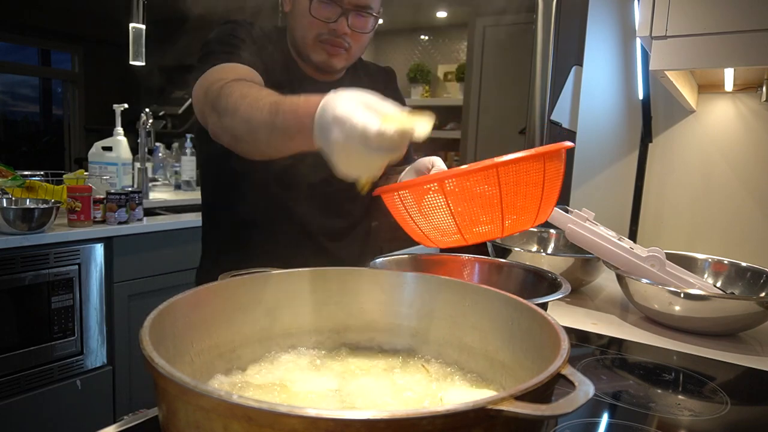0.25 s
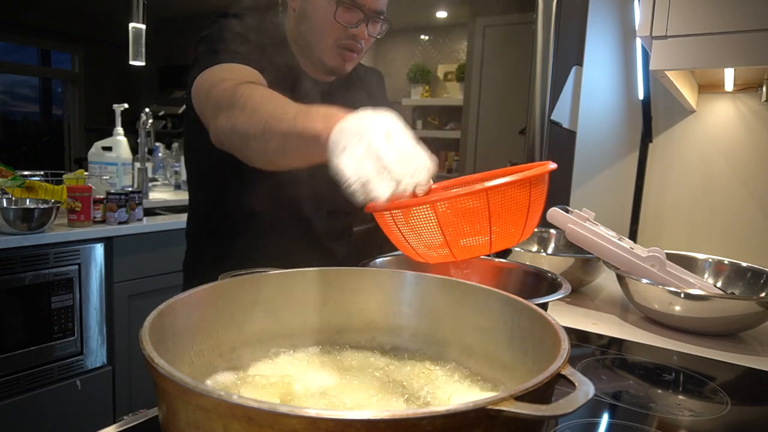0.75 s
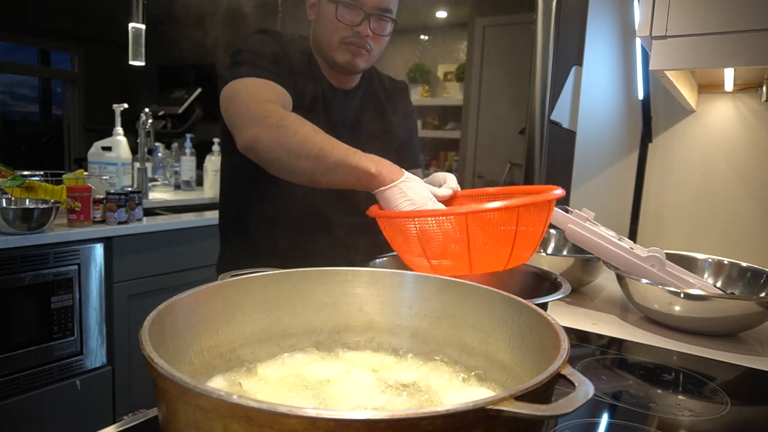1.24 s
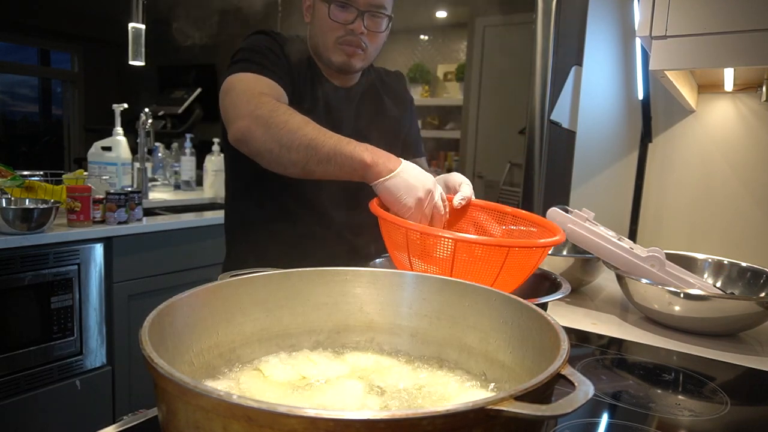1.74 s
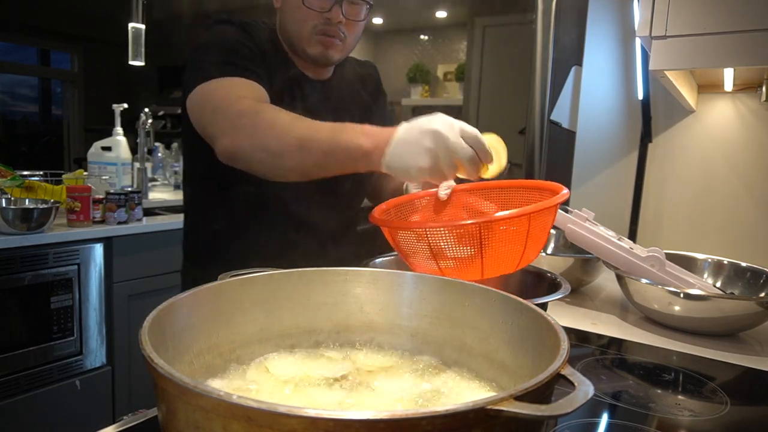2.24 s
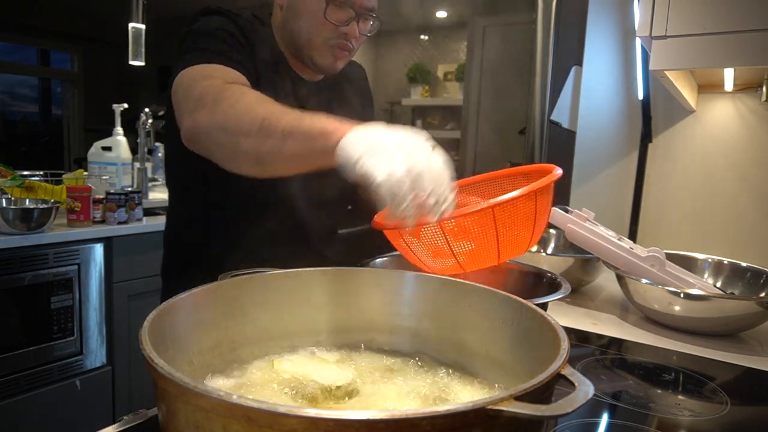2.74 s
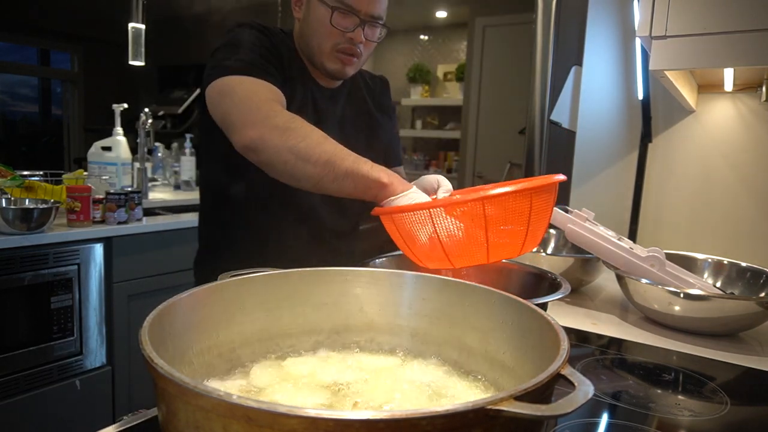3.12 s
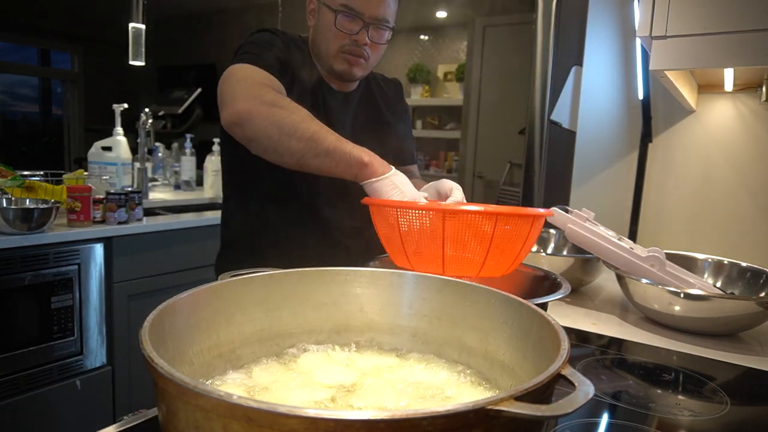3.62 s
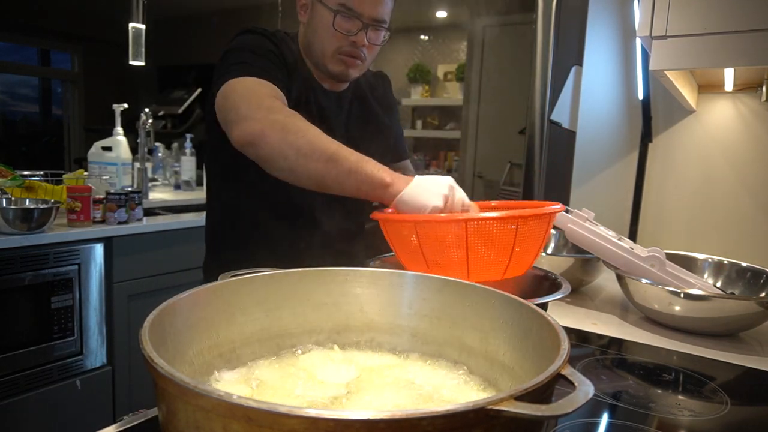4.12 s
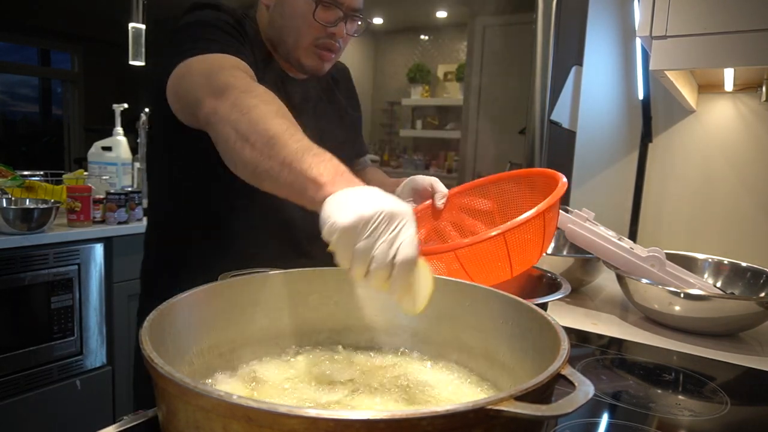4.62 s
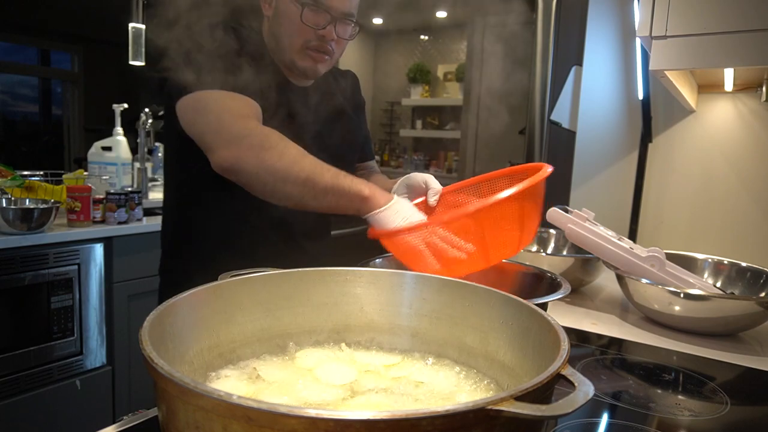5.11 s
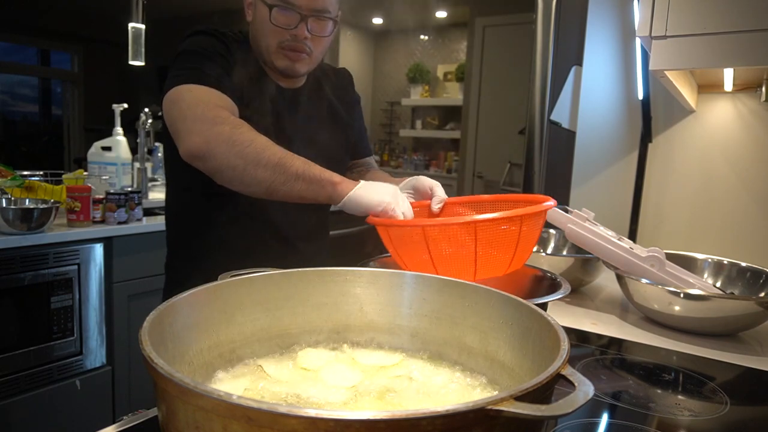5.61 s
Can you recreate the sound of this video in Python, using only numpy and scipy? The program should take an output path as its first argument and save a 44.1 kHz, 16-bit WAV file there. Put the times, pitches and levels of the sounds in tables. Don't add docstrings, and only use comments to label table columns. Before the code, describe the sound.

Close, unbroken deep-frying sizzle: bright fizzing hiss, constant irregular popping and crackling, low glugging bubbles, faint kitchen rumble beneath.

```python
import sys
import numpy as np
from scipy import signal
from scipy.fft import rfft, irfft
from scipy.io import wavfile

SR = 44100
rng = np.random.default_rng(int(sys.argv[2]) if len(sys.argv) > 2 else 0)


def undo_db(level):
    steps = np.asarray(level, float) / 20
    return 10 ** steps


def store_wav(level_fs):
    pcm = np.round(np.clip(np.atleast_2d(level_fs), -1, 1) * 32767)
    wavfile.write(sys.argv[1], SR, pcm.T.astype(np.int16))


N = 258426


def rms_one(x):
    return x / np.sqrt(np.mean(x ** 2) + 1e-20)


def at_hz(points, hz):
    points_hz, points_db = np.transpose(points)
    return np.interp(np.log(hz), np.log(points_hz), points_db)


def coloured(x, points, share=1):
    hz = np.maximum(np.arange(N // 2 + 1) * SR / N, 1)
    return irfft(rfft(x) * undo_db(share * at_hz(points, hz)), N)


def drift(rate_hz):
    r = np.exp(-80 * np.pi * rate_hz / SR)
    slow = signal.lfilter([1], [1, -2 * r, r * r], rng.standard_normal(N // 40 + 2002))[2000:]
    return np.interp(np.arange(N) / 40, np.arange(len(slow)), rms_one(slow))


def ring_poles(hz, r):
    return [1, -2 * r * np.cos(2 * np.pi * hz / SR), r * r]


# time in seconds, vigour of the frying as spray level in dB.
VIGOUR = [(0.0, -32), (0.47, -33), (0.8, -32), (1.2, -32.5), (1.53, -31.5), (2.04, -30.5), (2.45, -32.5),
          (2.97, -31), (3.44, -31.5), (3.85, -31), (4.2, -31.5), (4.58, -30), (4.96, -31.5), (5.4, -30.5),
          (5.86, -30)]


def vigour():
    return np.interp(np.arange(N) / SR, *np.transpose(VIGOUR))


def bubbling(spectrum, per_s, size_db, cycles, clump_db, count):
    sizes = undo_db(size_db * np.minimum(rng.exponential(1, N), 4)) * rng.choice([-1, 1], N)
    born = rng.random(N) < per_s * undo_db(clump_db * drift(22)) / SR
    dealt = rng.integers(0, count, N)
    out = np.zeros(N)
    for k, hz in enumerate(np.geomspace(spectrum[0][0], spectrum[-1][0], count)):
        r = undo_db(-60 * hz / (cycles * SR))
        resonator = [0, 1, 0, *ring_poles(hz, r)]
        rings = signal.sosfilt([resonator, resonator], sizes * born * (dealt == k) + 1e-18)
        out += rms_one(rings) * np.sqrt(hz) * undo_db(at_hz(spectrum, hz))
    return rms_one(out)


# frequency in Hz, level in dB per Hz.
GURGLE_SPECTRUM = [(200, -18), (240, -2.5), (400, -1), (600, -5.5), (750, -9.5), (950, -9.5)]


def gurgle(swing_db):
    gain = undo_db(-30 + 1.98 * swing_db)
    return gain * bubbling(GURGLE_SPECTRUM, per_s=560, size_db=0.5, cycles=9.2, clump_db=1.5, count=16)


# frequency in Hz, level in dB per Hz.
SEETHE_SPECTRUM = [(600, -6.5), (850, -18.5), (1200, 2), (1800, 3.5), (3000, -2.5), (4200, -3), (5150, -8),
                   (5800, -21), (8000, -19)]


def seethe(swing_db):
    gain = undo_db(0.6 * drift(6)) * undo_db(-23.5 + 0.38 * swing_db)
    return gain * bubbling(SEETHE_SPECTRUM, per_s=4000, size_db=3.0, cycles=16.0, clump_db=2.0, count=32)


# frequency in Hz, level in dB per Hz.
FIZZ_SPECTRUM = [(4500, -64), (6000, 15), (8000, -8), (11000, 6), (15500, -4)]


def fizz(vigour_db):
    gain = undo_db(vigour_db - 8.5)
    return gain * bubbling(FIZZ_SPECTRUM, per_s=400, size_db=3.0, cycles=33, clump_db=5.5, count=12)


# frequency in Hz, level in dB per Hz.
SPRAY_SPECTRUM = [(1500, 5.5), (4000, 5.5), (5600, -2.5), (6600, -2.5), (7300, -0.5), (8200, -4.5),
                  (9500, -5), (14000, -9), (16000, -11)]
# frequency in Hz, left-right likeness from 0 to 1.
LIKENESS = [(60, 0.99), (180, 1.0), (550, 1), (1650, 0.6), (4970, 0.18), (15000, 0.3)]


def spray(vigour_db):
    out, together = 0, drift(8)
    edges_hz = 1300 * 2 ** np.arange(0, 4.1, 0.5)
    white = rng.standard_normal((2, 2, N))
    for k, (low, high) in enumerate(zip(edges_hz, edges_hz[1:])):
        band = signal.butter(2, [low, high], "band", fs=SR, output="sos")
        mid, side = signal.sosfilt(band, white[k % 2])
        alike = at_hz(LIKENESS, np.sqrt(low * high))
        flicker = undo_db(0.7 * (1.8 * together + drift(8.3)))
        out = out + flicker * (np.sqrt(1 + alike) * mid + np.sqrt(1 - alike) * side * [[1], [-1]])
    return undo_db(vigour_db + 9.5) * rms_one(coloured(out, SPRAY_SPECTRUM))


# frequency in Hz, level in dB per Hz.
RUMBLE_SPECTRUM = [(20, -15), (43, 20.5), (76, -9), (130, 18.5), (150, 14), (180, -69), (215, -12)]


def rumble(swing_db):
    hum = rms_one(coloured(rng.standard_normal(N), RUMBLE_SPECTRUM + [(240, -62)]))
    return rms_one(undo_db(1.98 * swing_db)) * undo_db(1.5 * drift(4)) * undo_db(-48.5) * hum


def bursts(rows, cycles, glide, rough, width, trim_db, attack=0.06):
    length = 4000
    out = np.zeros(N + length)
    chance = rng.standard_normal((len(rows), length))
    cycles = np.maximum(np.broadcast_to(cycles, len(rows)), 0.5)
    for (s, peak_db, hz, *_), noise, rise in zip(rows, chance, cycles):
        turns = np.arange(length) * hz / SR
        swell = 1.73 * (1 - np.exp(-turns / (attack * rise))) * np.exp(-turns / (2.34 * rise))
        bend = 1 - glide + glide * np.minimum(turns / rise, 4) / 2
        tone = np.sin(2 * np.pi * turns * bend)
        r = np.exp(-1.4 * np.pi * hz * (width - 1 / width) / SR)
        splash = signal.sosfilt([[0.97, 0.0096, -1.034, *ring_poles(hz, r)]] * 2, noise)
        burst = swell * ((1 - rough) * tone + rough * rms_one(splash))
        start = int(s * SR)
        out[start:start + length] += burst * undo_db(peak_db + trim_db)
    return out[:N]


def rise_cycles(rows):
    return 1.6 * (np.array(rows)[:, 2] / 1000) ** 0.5


# start in seconds, peak in dB, pitch in Hz, limiter depth in units of 2.15 dB (below 0: none).
CRACKS = [(0.0161, -13, 1350, 0.8), (0.3186, -7.5, 2500, 2.5), (0.4107, -11, 2540, 1.5),
          (0.6194, -6, 1770, 3.5), (0.8993, -10.5, 1730, -1.5), (1.1616, -10.5, 1275, 1),
          (1.308, -7, 2700, 3), (1.481, -10.5, 3650, 1.5), (1.5877, -7.5, 3560, 3.5), (1.6765, -9, 1420, 2),
          (1.842, -13, 1886, 2), (1.902, -8.5, 1670, 1.5), (2.1185, -9, 3750, 1), (2.3764, -9.5, 3720, 4.5),
          (2.408, -13, 1320, 1), (2.5429, -8.5, 2436, -6), (2.5549, -7, 3420, 2.5), (3.3296, -6.5, 1540, 5),
          (3.4903, -9, 1846, 4.5), (3.6195, -7, 1440, 4), (3.8046, -12, 1560, 1.5),
          (3.9287, -5.5, 2020, 2.2), (4.4344, -13, 1110, 1.8), (4.8274, -8.5, 2690, 3),
          (4.994, -9.5, 3700, 2), (5.5844, -3, 1802, 6), (5.6962, -9.5, 1620, -2), (5.7712, -10, 2470, 2.3),
          (5.8457, -11.5, 1460, 1.4)]


def cracks():
    return bursts(CRACKS, rise_cycles(CRACKS), glide=0.0085, rough=0.18, width=1.3, trim_db=4.0, attack=0.77)


# start in seconds, peak in dB, pitch in Hz.
PIPS = [(0.0239, -6.5, 2720), (0.1013, -13.4, 1940), (0.1016, -12, 2670.0), (0.2054, -8, 1860),
        (0.2874, -5, 2560.0), (0.4253, -8, 2440), (0.4624, -9, 1950.0), (0.4729, -9, 2580),
        (0.4805, -16, 2560.0), (0.5707, -9, 1950.0), (0.6272, -2, 1830), (0.6807, -11, 2770.0),
        (0.6833, -7, 1970), (0.7211, -11, 2540), (0.7634, -9, 2020), (0.8107, -16, 2060),
        (0.8941, -11, 1950.0), (0.9059, -9, 2600), (0.9678, -14, 2660), (1.1028, -12, 2040),
        (1.1761, -6.5, 2560.0), (1.2892, -8, 2150), (1.3033, -9, 2560.0), (1.4228, -12, 1953),
        (1.563, -10.5, 2280.0), (1.6351, -6.5, 1990), (1.763, -6, 2360), (2.1798, -8, 2291),
        (2.3972, -8, 2535), (2.4325, -3.5, 2580), (2.6433, -7.5, 2430), (2.8981, -16, 2770.0),
        (2.9121, -10.5, 2650), (3.1517, -8, 2680), (3.3244, -10, 3150), (3.4943, -3, 1810),
        (3.5442, -10, 1870.0), (3.6118, -9.5, 2670.0), (3.7449, -10, 2150), (3.795, -10, 2190.0),
        (3.8116, -7, 2445), (4.0258, -16, 3000.0), (4.2555, -8, 3050), (4.4122, -14, 1980),
        (4.6461, -8, 1850), (4.7298, -10, 2890.0), (4.7368, -12, 2700), (4.7848, -10, 2000),
        (4.9071, -9, 2560.0), (5.1982, -11, 2370.0), (5.3688, -7, 1810), (5.3806, -22, 2298),
        (5.432, -12, 2347), (5.5011, -11, 2100), (5.502, -15, 3025), (5.5224, -11, 2170),
        (5.5312, -11, 2980), (5.542, -10, 1860), (5.66, -12, 2280.0), (5.8383, -16, 2540)]


def pips():
    return bursts(PIPS, rise_cycles(PIPS), glide=0.0092, rough=0.097, width=1.26, trim_db=-2.5, attack=0.3)


# start in seconds, peak in dB, pitch in Hz.
CRACKLE = [(0.0605, -13.5, 3800.0), (0.4989, -11.5, 3950.0), (0.6135, -16, 3630), (0.7559, -13.9, 3360),
           (0.7655, -15, 4100), (0.7941, -11.2, 3900), (0.9677, -14, 3380), (1.0164, -18, 3650.0),
           (1.0777, -13, 3640), (1.3078, -8, 3480), (1.3685, -14, 3830), (1.4559, -12, 3700),
           (1.491, -11, 4000), (1.7622, -11, 3720), (2.0167, -16, 3340), (2.0538, -18, 4110.0),
           (2.2189, -12, 3670), (2.2786, -15.5, 3600), (2.2954, -17, 3950.0), (2.3511, -9.5, 3250.0),
           (2.5617, -10.5, 3620), (2.764, -10.2, 3658), (2.7798, -15, 3530), (2.9276, -12.5, 4300),
           (2.944, -13.0, 3670), (3.0188, -17, 3380.0), (3.0329, -16, 3510.0), (3.0391, -13, 3120.0),
           (3.172, -20, 3510.0), (3.1917, -9.8, 3650.0), (3.2739, -9, 4060), (3.5367, -12.4, 3760),
           (3.5581, -13, 3300), (3.7514, -15.6, 4970), (3.8121, -13, 3980), (3.9127, -12.5, 3950.0),
           (4.0902, -18, 3630), (4.1664, -13.0, 4000), (4.172, -17, 3800.0), (4.3708, -14, 4017),
           (4.4566, -13, 3120.0), (4.4669, -9.5, 3300), (4.538, -10, 3350), (4.5736, -18, 3820),
           (4.58, -18, 4440.0), (4.6914, -17, 3800.0), (4.8471, -10.5, 4150), (4.924, -15, 4260),
           (5.0935, -14, 3893), (5.164, -13, 3780), (5.1798, -14.5, 3950.0), (5.1868, -17, 3820),
           (5.234, -12.5, 4040), (5.3006, -12.5, 3900), (5.3511, -9.0, 3380.0), (5.5336, -16, 5000.0),
           (5.6205, -10, 3930), (5.69, -17, 4240), (5.7711, -14, 3650.0), (5.8438, -11.5, 3680)]


def crackle():
    return bursts(CRACKLE, rise_cycles(CRACKLE), glide=0.01, rough=0.15, width=1.7, trim_db=1.5, attack=0.24)


# start in seconds, peak in dB, pitch in Hz.
POPS = [(0.142, -5.5, 1310), (0.2455, -26, 655), (0.418, -10, 1450), (0.4737, -7, 1570),
        (0.6672, -3.5, 1460), (0.6733, -12.4, 1470), (1.0175, -16.0, 845), (1.0246, -18.5, 860),
        (1.0268, -18, 630), (1.0314, -22, 840), (1.3448, -2, 1750), (1.3505, -8, 1680),
        (1.4231, -14.5, 810), (1.4311, -15, 1060), (1.442, -12, 1340), (1.4505, -14, 1080.0),
        (1.84, -13.5, 700.0), (2.0057, -10.5, 1270), (2.0122, -14, 695), (2.0147, -12, 950),
        (2.0217, -11.5, 810), (2.3955, 2, 1820), (2.4704, -9, 1090), (2.5094, -11, 1160),
        (2.7904, -14, 880), (3.0067, -9, 1690), (3.018, -13.1, 1764), (3.0232, -5.5, 1700),
        (3.0999, -8, 1270.0), (3.1022, -15.5, 780), (3.3371, -2.5, 1630), (3.5005, 1, 1870),
        (3.5377, -14, 1820), (3.6932, -4, 1644), (3.7024, -11.5, 1109), (3.7028, -10, 1730.0),
        (3.7482, -5, 1690), (3.9794, -6, 1420.0), (3.9866, -12.3, 1500), (4.0136, -6.5, 1010),
        (4.0151, -18, 760.0), (4.026, -19, 1090), (4.1937, -9.5, 1360), (4.3097, -6.5, 1730.0),
        (4.4274, -12, 1110), (4.5861, -9.5, 1740), (4.6462, -13.7, 1270.0), (4.6763, -5, 1800.0),
        (4.6842, -11, 1587), (4.709, -13.1, 1320.0), (4.7989, -7, 1120.0), (4.8121, -18, 1100),
        (4.8704, -16, 920.0), (5.0095, -4.5, 1600.0), (5.0132, -7, 1290), (5.1324, -10.5, 1330),
        (5.6593, -6, 1300), (5.7652, -9.5, 1830), (5.7714, -3.5, 1512), (5.8525, -9, 1480.0)]


def pops():
    return bursts(POPS, rise_cycles(POPS), glide=0.016, rough=0.28, width=0.87, trim_db=-1.0, attack=0.42)


# start in seconds, peak in dB, pitch in Hz.
GLUGS = [(0.2338, -12, 316), (0.2334, -20, 235), (0.2373, -19, 460), (0.2434, -27, 343.3),
         (0.2499, -17, 694), (0.6061, -15.5, 306), (0.9258, -18, 638), (1.021, -14, 530),
         (1.0392, -25, 766), (1.043, -25, 720), (1.1004, -14, 590), (1.1051, -20, 688), (1.1628, -21, 930),
         (1.4305, -24, 743), (1.4405, -17.4, 1003), (1.4447, -22, 990), (1.8352, -24, 688),
         (1.8344, -13, 305.8), (1.8409, -15.5, 530), (1.8439, -21, 880), (1.8471, -22, 670),
         (1.8515, -18, 675), (1.8565, -20, 724), (1.8619, -19, 743), (2.03, -26, 867), (2.0334, -20, 925),
         (2.2278, -18, 960), (2.7822, -15, 563), (2.7861, -17, 790), (2.7946, -18, 467), (3.0749, -15, 257),
         (3.2863, -21, 1010), (3.4266, -14.5, 466), (3.6907, -16, 936), (4.0072, -17.9, 1020),
         (4.0104, -18.4, 610.6), (4.0178, -18.0, 526), (4.0198, -21, 910), (4.0497, -17.2, 322),
         (4.0498, -17.5, 234), (4.0542, -23, 500), (4.0634, -24, 248), (4.1392, -14, 280),
         (4.1423, -14, 594), (4.4297, -15, 451), (4.7269, -14.5, 647), (4.8609, -22, 460),
         (4.8646, -14, 282), (4.8676, -21, 451), (4.874, -21, 423), (4.9323, -17, 340),
         (4.9366, -17.8, 473), (4.941, -20, 867), (4.9428, -20, 434), (4.9519, -16.5, 834),
         (5.3062, -17.9, 570), (5.4072, -18.5, 480), (5.4397, -20, 274), (5.6624, -20.9, 715),
         (5.7328, -16.3, 310)]


def glugs():
    return bursts(GLUGS, cycles=2.0, glide=0.012, rough=0.29, width=1.37, trim_db=-4.0, attack=0.17)


# start in seconds, peak in dB, pitch in Hz.
SPITS = [(0.6055, -17, 7300), (0.811, -19.9, 7440), (0.8538, -13, 7400), (1.1285, -13, 7300),
         (1.1287, -12, 5700), (1.1432, -20.9, 5877), (1.4717, -17, 9020), (2.3698, -19, 7900),
         (3.0381, -16, 6442), (3.2723, -20, 8748), (3.2801, -8.5, 7740), (3.2902, -19.9, 9020),
         (3.7456, -16, 6642), (3.7517, -18, 5550), (4.6829, -18, 6248), (4.6829, -19.5, 8229),
         (4.7635, -13, 5362), (4.7867, -15, 5570), (4.9654, -17, 6248), (4.9679, -17, 7900),
         (4.9739, -16, 8100), (4.9792, -19, 6100), (4.984, -18, 8484), (5.4144, -16, 6400),
         (5.7116, -15, 8748), (5.7946, -13, 7507), (5.8185, -17, 6600), (5.8188, -20.4, 8484),
         (5.8563, -12, 9020), (5.8564, -14, 7281)]


def spits():
    return bursts(SPITS, cycles=4.2, glide=0.01, rough=0.25, width=1.6, trim_db=-1.5, attack=0.28)


# start in seconds, peak in dB, pitch in Hz.
SNAPS = [(0.6055, -13, 13398), (0.6709, -16, 14679), (0.8108, -16, 9930), (0.9214, -12, 12700),
         (1.0003, -19, 9650), (1.0224, -16, 10189), (1.1483, -18, 10828), (1.1483, -17, 13812),
         (1.1903, -16, 12997), (1.2112, -12, 13812), (1.4718, -19.9, 12997), (1.4718, -14, 10600),
         (1.4773, -22.4, 10828), (1.9292, -11, 13398), (2.3694, -21.8, 10828), (2.3697, -23.3, 14679),
         (2.6885, -12, 14679), (2.694, -22.9, 13812), (2.7005, -23.7, 14600), (3.0562, -12.5, 12607),
         (3.2687, -18, 10189), (3.2798, -16, 10189), (3.2804, -22.9, 12607), (3.2894, -19.7, 9587),
         (3.5575, -23.8, 15132), (3.5673, -21.5, 12997), (3.5965, -13, 13812), (4.2556, -17, 11163),
         (4.293, -19, 11863), (4.4385, -19, 13812), (4.6831, -17, 9884), (4.6831, -16, 13812),
         (4.9646, -23, 10828), (4.968, -21.3, 14679), (4.9681, -19, 10400), (4.9737, -16, 10828),
         (4.9741, -18.6, 14679), (4.9838, -18, 12607), (4.9919, -22.6, 11508), (5.372, -19, 13420),
         (5.5076, -24.4, 15132), (5.8185, -16, 9587), (5.8561, -17.1, 10189), (5.8564, -16, 13812)]


def snaps():
    return bursts(SNAPS, cycles=3.6, glide=0.011, rough=0.25, width=2.1, trim_db=2.0, attack=0.35)


# start in seconds, peak in dB, pitch in Hz.
BLUBS = [(0.9231, -18, 421), (1.0162, -18, 620), (1.0363, -21, 589), (1.425, -13, 1150),
         (2.5076, -15, 430.3), (2.781, -5, 1340), (3.0041, -20, 244), (3.0117, -19, 547.5),
         (3.0233, -19, 475), (3.0558, -20.5, 245), (3.2863, -17, 464), (3.4558, -16.5, 266),
         (4.1607, -15, 394), (4.3785, -20.5, 230), (4.4758, -19, 297), (4.7956, -15, 584),
         (4.9501, -19, 420), (4.954, -17.5, 258), (5.0972, -14, 328), (5.1335, -16.5, 575),
         (5.4161, -19, 625), (5.4665, -15, 598), (5.4774, -16, 348), (5.6623, -15, 458)]


def blubs():
    return bursts(BLUBS, cycles=2.25, glide=0.015, rough=0.32, width=1.0, trim_db=-5.5, attack=0.21)


# start in seconds, peak in dB, centre in Hz, rise in cycles.
SIZZLES = [
    (1.126, -30, 6200, 92),
    (3.28, -27, 9100, 63),
    (3.555, -29, 13500, 90),
    (4.963, -24.5, 10500, 100),
]


def sizzles():
    return bursts(SIZZLES, np.array(SIZZLES)[:, 3], glide=0, rough=1.0, width=1.2, trim_db=-3.0)


def stirring(single):
    r = np.exp(-1 / (0.018 * SR))
    wake = signal.lfilter([1 - r], [1, -r], single ** 2)
    return undo_db(3.0 * (np.tanh(wake / wake.mean() / 2) * 2 - 1))


# air resonance in Hz, width in Hz, lift in dB.
POT = [(240, 25, 5), (297, 30, 5), (375, 30, 5), (485, 35, 3), (585, 50, 4), (850, 60, 6), (1035, 50, 4),
       (1110, 45, 5), (1195, 60, -6), (1270, 40, 3), (1335, 35, 5), (1390, 40, -3), (1485, 35, 3),
       (1565, 45, -5), (2050, 80, 2), (2590, 80, 2)]


def pot(x):
    sections = []
    for hz, width_hz, db in POT:
        a, lift = np.pi * width_hz / SR, undo_db(db / 2)
        middle = -2 * np.cos(2 * np.pi * hz / SR)
        section = [1 + a * lift, middle, 1 - a * lift, 1 + a / lift, middle, 1 - a / lift]
        sections.append(np.array(section) / (1 + a / lift))
    return signal.sosfilt(sections, x)


def echoed(x, echoes):
    spectrum, w = rfft(x), 2 * np.pi * np.arange(N // 2 + 1) * SR / N
    for s, feedback in echoes:
        late, g = np.exp(-1j * w * s), np.clip(feedback, 0, 0.74)
        spectrum = spectrum * (g + late) / (1 + g * late)
    return irfft(spectrum, N)


SHARED_ECHOES = [(.0023, -1), (.0037, -6), (.0068, 1), (0.0096, -14), (0.0134, 0.96), (0.023, -2)]
APART_ECHOES = [(.0004, 0.42), (.0013, 0.44), (.0041, 0.2), (.0097, 0.73)]


def kitchen(x):
    mid = x + undo_db(-9.5) * echoed(x, SHARED_ECHOES)
    high = signal.butter(4, 495, "high", fs=SR, output="sos")
    side = signal.sosfilt(high, echoed(mid, APART_ECHOES))
    return mid + undo_db(-11.0) * side * [[1], [-1]]


def scene():
    vigour_db = vigour()
    swing_db = vigour_db - vigour_db.mean()
    oil = gurgle(swing_db) + seethe(swing_db) + fizz(vigour_db)
    droplets = spray(vigour_db)
    hum = rumble(swing_db)
    single = cracks() + pips() + crackle() + pops() + glugs() + spits() + snaps() + blubs() + sizzles()
    near = kitchen(pot(oil * stirring(single) + single))
    return near + droplets + hum


def limiter():
    reaction_s, attack_s, release_s = 0.0006, 0.0007, 0.037
    depth_db, ramp = np.full(N, 1e-3), np.arange(N) / SR / release_s
    for s, _, _, db in CRACKS:
        depth_db[int((s + reaction_s) * SR)] = max(2.15 * db, 1e-3)
    held_db = np.exp(np.maximum.accumulate(np.log(depth_db) + ramp) - ramp)
    r = np.exp(-1 / (attack_s * SR))
    return undo_db(-signal.lfilter([1 - r], [1, -r], held_db))


# frequency in Hz, left-right difference in dB.
SIDES = [(500, 0), (1300, -1), (2400, -2.5), (4400, -1.5), (8000, -2.5), (15000, -4)]


def tilt(x):
    return np.array([coloured(x[0], SIDES, share=0.5), coloured(x[1], SIDES, share=-0.5)])


def band_limit(x):
    return signal.sosfilt(signal.butter(12, 17000, fs=SR, output="sos"), x)


def record(dry):
    low = signal.sosfilt(signal.butter(6, 150, fs=SR, output="sos"), dry)
    bass_cut = signal.cheby2(8, 30, 195, "high", fs=SR, output="sos")
    cut = signal.sosfilt(bass_cut, dry) + undo_db(-1.0) * low
    held = 1.1 * np.tanh(tilt(cut) * limiter() / 1.1)
    treble_cut = signal.ellip(12, 0.5, 70, 15850, fs=SR, output="sos")
    mix = signal.sosfilt(treble_cut, held)
    return band_limit(mix)


dry = scene()
out = record(dry)
store_wav(out)
```